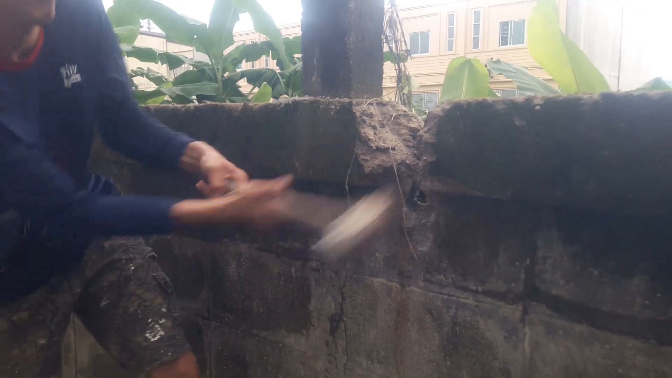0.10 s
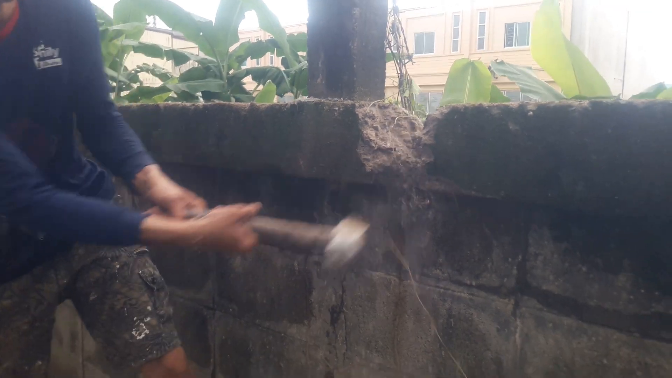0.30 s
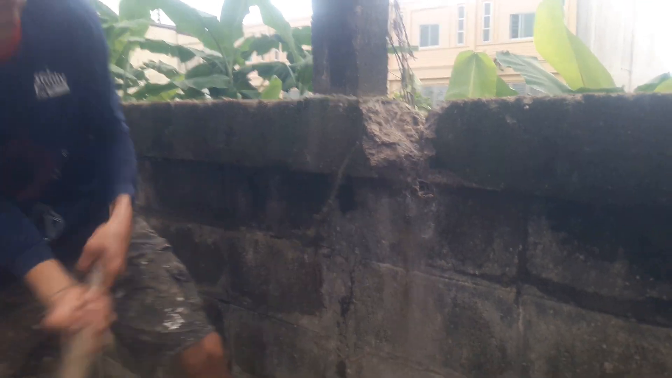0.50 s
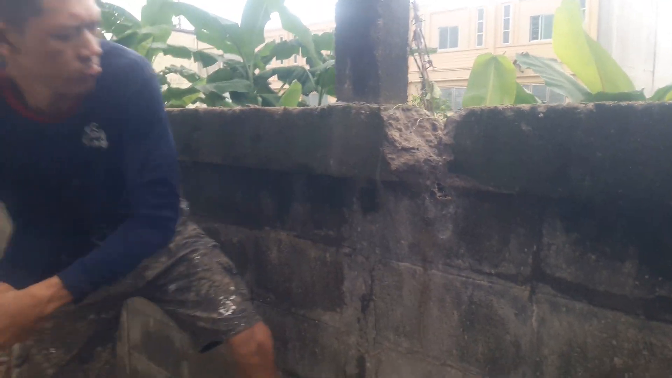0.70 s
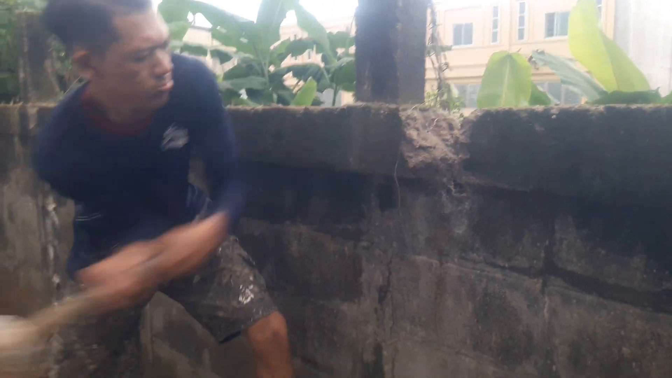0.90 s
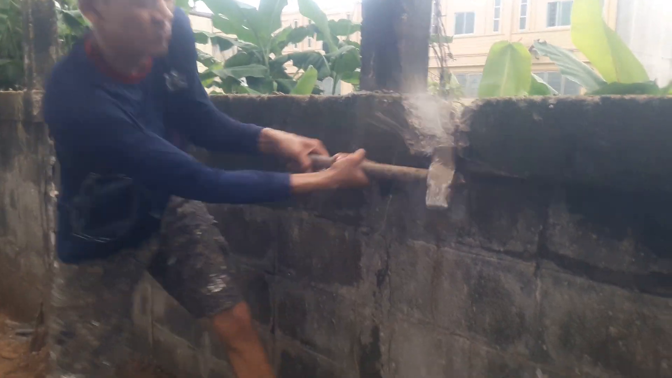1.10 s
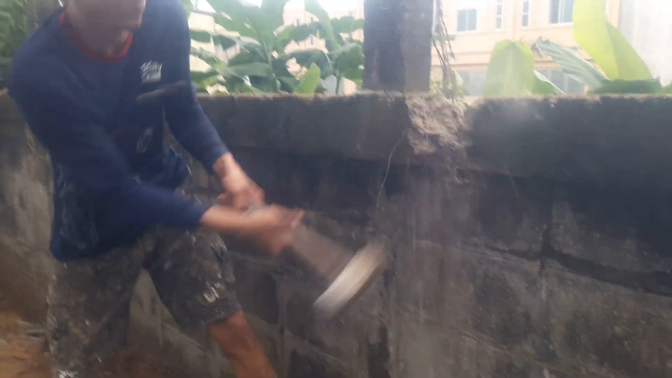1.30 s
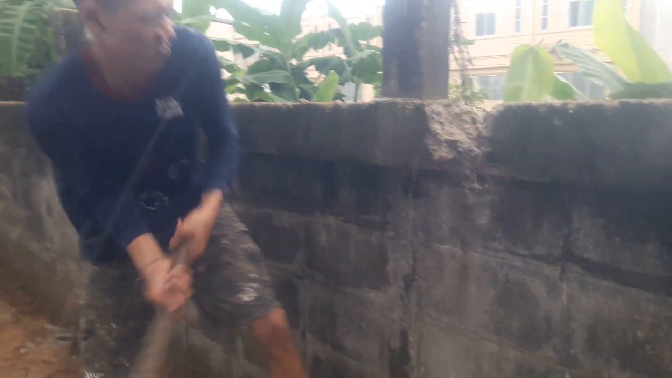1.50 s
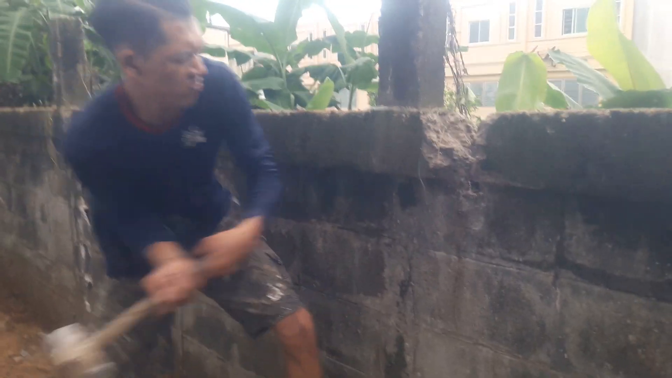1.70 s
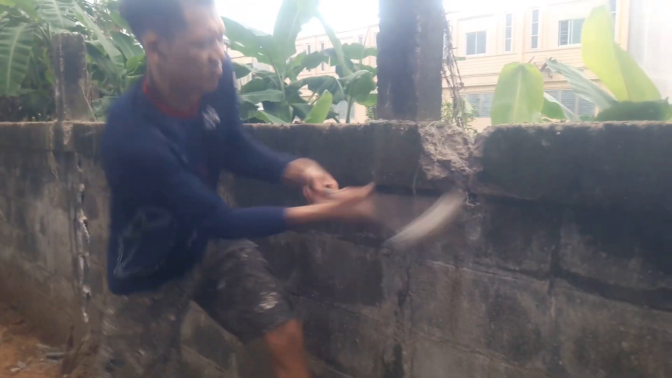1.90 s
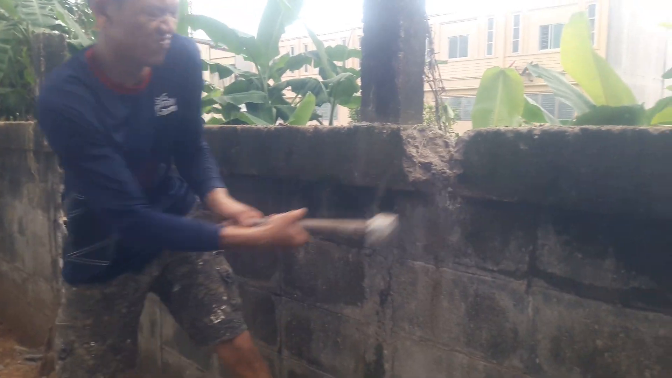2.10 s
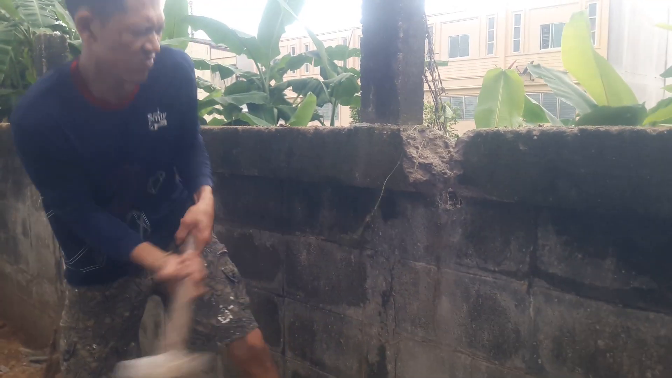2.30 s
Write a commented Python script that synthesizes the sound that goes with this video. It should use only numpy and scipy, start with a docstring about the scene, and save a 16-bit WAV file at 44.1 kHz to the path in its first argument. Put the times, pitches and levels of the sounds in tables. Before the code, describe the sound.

Sledgehammer blows hit a hollow concrete block wall at about 0.2, 1.1 and 2.0 seconds: hollow low-mid thud, crunching crack, quick yard reflections and a dull longer tail. The first is crunchiest, the second softer, the third loud and brighter with faint steel ring. Two tiny squeaks precede the first. Chips tick, a chunk knocks at 1.66, then rustle and grit increase. Faint air and hum persist.

```python
"""A faint low hum and a low background rumble run throughout; clothes and grit rustle and small chips tick
around three sledgehammer blows on a hollow concrete block wall in a small walled yard. Hum is narrow-band
noise; rustle is noise plus sparse grains; chips are short coloured noise bursts. Each blow sums decaying wall
modes, a decaying noise crack and two steel modes, then a delayed noise tail from the yard and from buildings
beyond. One larger chunk knocks as a few decaying modes."""
import sys
import numpy as np
from scipy import signal
from scipy.fft import rfft, irfft
from scipy.io import wavfile
from scipy.ndimage import uniform_filter1d

SR = 44100
rng = np.random.default_rng(int(sys.argv[2]) if len(sys.argv) > 2 else 0)


def generate_wav(sig):
    """Save sig (samples, or channels by samples) to the path in sys.argv[1] as 16-bit PCM at SR."""
    pcm = np.round(np.clip(np.atleast_2d(sig).T, -1, 1) * 32767).astype(np.int16)
    wavfile.write(sys.argv[1], SR, pcm)


N = 103635
TIME_S = np.arange(N) / SR   # scene time
TAIL_S = np.arange(SR) / SR   # time since an event


def amp(db):
    """Decibels to gain."""
    return 10 ** (np.asarray(db) / 20)


def rms_one(x):
    """Scale to unit rms."""
    return x / np.sqrt(np.mean(x ** 2) + 1e-20)


def at_hz(points, hz):
    """Interpolate (f/Hz, value) points on a log-frequency axis."""
    f, value = np.transpose(points)
    return np.interp(np.log(np.maximum(hz, 1)), np.log(f), value)


def level_curve(points):
    """Gain over the scene from (t/s, level/dB) points."""
    return amp(np.interp(TIME_S, *np.transpose(points)))


def dying(t60_s):
    """Exponential decay, -60 dB after t60."""
    return np.exp(-np.minimum(np.log(1000) * TAIL_S / max(t60_s, 1e-4), 60))


def add(out, s, sound):
    """Mix a sound in at a time, cut at the scene's end."""
    i = max(int(s * SR), 0)
    out[i:i + len(sound)] += sound[:max(N - i, 0)]


def colour(x, spectrum):
    """Filter noise by a gain spectrum."""
    hz = np.fft.rfftfreq(len(x), 1 / SR)
    return irfft(rfft(x) * amp(at_hz(spectrum, hz)), len(x))


def narrow_noise(hz, width_hz):
    """A wavering tone: noise through a narrow resonance, rms 1."""
    offset = (np.fft.rfftfreq(N, 1 / SR) - hz) / width_hz
    return rms_one(irfft(rfft(rng.standard_normal(N)) / (1 + offset ** 2), N))


def flutter(n, spread_db, smooth_s):
    """A gain that wanders at random, rms 1."""
    wander = uniform_filter1d(rng.standard_normal(n), max(int(smooth_s * SR), 1))
    return rms_one(amp(spread_db * rms_one(wander)))


def dying_noise(spectrum, t60s, tilt_db_per_octave):
    """Countless overlapping modes: octave bands of noise, each dying at its own rate."""
    hz = np.fft.rfftfreq(SR, 1 / SR)
    octave = np.log2(np.maximum(hz, 40) / 640)   # tilt pivots at 640 Hz
    gain_db = at_hz(spectrum, hz) + tilt_db_per_octave * octave
    noise = rfft(rng.standard_normal(SR)) * amp(gain_db)
    band = np.round(octave)
    out = np.zeros(SR)
    for k in np.unique(band):
        in_band = band == k
        out += irfft(noise * in_band, SR) * dying(at_hz(t60s, hz[in_band].mean()))
    return out


MODE_SPREAD_DB = 1.5


def ring(modes):
    """Struck modes (f/Hz, level/dB, t60/s): decaying sines, strengths redrawn for each hit."""
    out = np.zeros(SR)
    for k, (hz, db, t60_s) in enumerate(modes):
        strength = (-1) ** k * amp(db + MODE_SPREAD_DB * rng.standard_normal())
        out += strength * np.sin(2 * np.pi * hz * TAIL_S) * dying(t60_s)
    return out


# background rumble spectrum: f/Hz, relative gain/dB
RUMBLE_SPECTRUM = [(25, -30), (55, 2), (85, 4), (140, 4), (240, 2.5), (420, -7), (800, -7), (1400, -12.5),
                   (2100, -10.5), (3600, -34), (5300, -31), (7800, -40), (9000, -24), (10300, -61),
                   (15500, -62)]
# low background rumble rises and sinks: t/s, rms level/dB
RUMBLE_LEVEL_CURVE = [(0, -48), (.2, -49.5), (.6, -55), (.95, -57.5), (1.5, -52), (1.9, -54), (2.35, -45)]


def rumble():
    """Low background rumble: coloured noise under a slow level curve, louder at start and end."""
    return level_curve(RUMBLE_LEVEL_CURVE) * rms_one(colour(rng.standard_normal(N), RUMBLE_SPECTRUM))


# distant machinery: f/Hz, resonance width/Hz, rms level/dB
HUM_BANDS = [(151.9, 5.3, -56), (173.1, 7.6, -55), (321, 16, -58.5)]


def hum():
    """Distant machinery: wavering narrow-band tones."""
    return sum(amp(db) * narrow_noise(hz, width_hz) for hz, width_hz, db in HUM_BANDS)


# clothes and grit over time: t/s, level/dB
RUSTLE_LEVEL_CURVE = [(0, -53.5), (.1, -54.5), (.2, -55), (.45, -77), (.71, -63.5), (.74, -59.5), (.9, -56),
                      (1.1, -63.5), (1.3, -62.5), (1.57, -70.5), (1.69, -49), (1.85, -52), (2.0, -51.5),
                      (2.2, -50), (2.35, -58)]
# friction spectrum: f/Hz, relative gain/dB
RUSTLE_SPECTRUM = [(150, -5), (450, 9), (900, 0), (2100, 5.5), (3700, -6.5), (5600, 1), (7800, -9),
                   (9100, 0.5), (11000, -10), (13000, -6.5), (15500, -17)]
GRAINS_PER_S, GRAIN_SPREAD_DB, GRAIN_LIMIT, GRAIN_SHARE = 700, 3.5, 3, 0.97   # limit in spreads
RUSTLE_FLUTTER_DB, RUSTLE_FLUTTER_S = 2, 0.012


def rustle():
    """Clothes and grit underfoot: soft friction hiss with sharp little grains, rising and falling."""
    size_db = GRAIN_SPREAD_DB * np.minimum(rng.exponential(1, N), GRAIN_LIMIT)
    sizes = amp(size_db) * rng.choice([-1, 1], N)
    grains = rms_one(sizes * (rng.random(N) < GRAINS_PER_S / SR))
    friction = rng.standard_normal(N) + GRAIN_SHARE * grains
    friction = friction * flutter(N, RUSTLE_FLUTTER_DB, RUSTLE_FLUTTER_S)
    return level_curve(RUSTLE_LEVEL_CURVE) * rms_one(colour(friction, RUSTLE_SPECTRUM))


GRIT_DB, GRIT_S = 2.5, 0.0012   # unevenness of crumbling concrete
# chip spectrum points: f/Hz
CHIP_BANDS_HZ = [700, 1800, 2800, 4800, 11000]
CHIP_BASS_LIFT_DB, CHIP_TOP_CUT_DB = 7, 13   # at 150 and 16000 Hz, from the nearest band
CHIP_DIP_DB, CHIP_DIP_HZ, CHIP_DIP_OCTAVES = 9, 3650, 0.3


def chip_spectrum(levels_db):
    """Smoothed outline through the chip's band levels, with a dip in the treble."""
    hz = np.geomspace(100, 16000, 60)
    low, high = (150, levels_db[0] + CHIP_BASS_LIFT_DB), (16000, levels_db[-1] - CHIP_TOP_CUT_DB)
    outline = [low, *zip(CHIP_BANDS_HZ, levels_db), high]
    smooth_db = uniform_filter1d(at_hz(outline, hz), size=9)
    dip_db = CHIP_DIP_DB * np.exp(-(np.log2(hz / CHIP_DIP_HZ) / CHIP_DIP_OCTAVES) ** 2)
    return np.c_[hz, smooth_db - dip_db]


# chips crack off, land and shift: t/s, length/s (half the t60),
# then outline level/dB at each CHIP_BANDS_HZ, before smoothing and dip
CHIP_EVENTS = [(0.009, 0.011, -27, -59, -46, -40, -28.5), (0.079, 0.0089, -29, -27.5, -12.5, -37, -41),
               (0.2442, 0.017, -16, 7, -9.5, -19, -22), (0.2595, 0.0047, -8, -10, -22, -19, -18),
               (0.266, 0.0062, -12, -3, -15, -11, -28), (0.4999, 0.012, -22.5, -18, -33, -34, -51),
               (0.541, 0.007, -47, -50, -58, -32, -63), (0.5829, 0.012, -37.5, -7, -36, -33, -67),
               (0.735, 0.033, -60, -35, -46, -42, -55), (0.772, .008, -56, -54, -50, -50, -37.5),
               (0.825, 0.013, -26.5, -31, -39, -63, -62), (0.85, 0.02, -55, -30, -32, -62, -48),
               (1.083, .008, -55, -60, -53, -43, -54), (1.1684, 0.022, -26, -5, -16.5, -29, -26),
               (1.493, 0.0034, -56, -52, -52, -59, -48), (1.579, 0.013, -49, -44, -22, -43, -75),
               (1.6596, 0.011, -16.5, -8, -20, -23, -32.5), (1.736, 0.0067, -51, -48, -37, -45, -40),
               (1.772, 0.0092, -48, -24, -26, -46, -51), (1.818, 0.012, -41, -30, -38, -43, -36),
               (1.874, 0.01, -58, -33, -20, -42, -34), (1.918, 0.016, -25, -21.5, -13.5, -27.5, -35.5),
               (1.947, 0.012, -37, -31, -32, -38, -32), (1.958, 0.014, -22, -11, -9.5, -26, -25),
               (1.979, 0.035, -33, -29, -21, -33, -39), (2.0102, 0.0051, -2, 3.5, 3, -17, -16),
               (2.0332, 0.037, -2, -17, -19, -34, -25), (2.042, 0.0069, -5, -11, -7, -10, -49),
               (2.182, 0.02, -27, -30, -31, -36, -49), (2.258, 0.009, -37, -40, -29, -39.5, -44)]
CHIP_ATTACK_S, CHIP_BOUNCE_S, CHIP_BOUNCE_DB = 0.00062, 0.0025, -4


def chips():
    """Concrete chips: gritty noise clicks, each bouncing once."""
    out, n = np.zeros(N), SR // 4
    for s, length_s, *levels_db in CHIP_EVENTS:
        spectrum = chip_spectrum(levels_db)
        envelope = np.minimum(TAIL_S / CHIP_ATTACK_S, 1) * dying(2 * length_s)
        for delay_s, db in ((0, 0), (CHIP_BOUNCE_S, CHIP_BOUNCE_DB)):
            grit = rng.standard_normal(n) * flutter(n, GRIT_DB, GRIT_S)
            add(out, s + delay_s, amp(db) * colour(grit, spectrum) * envelope[:n])
    return out


# larger piece on the ground: f/Hz, relative level/dB, t60/s
CHUNK_RING = [(659, 2, 0.034), (1340, -0.5, 0.027), (1610, -6, 0.014), (1833, 6.5, 0.024), (2205, 4, 0.014),
              (5310, -4.5, 0.015)]
CHUNK_AT_S, CHUNK_DB = 1.6598, -24.5


def chunk():
    """A larger piece knocks on the ground and rings briefly in its own modes."""
    out = np.zeros(N)
    add(out, CHUNK_AT_S, amp(CHUNK_DB) * ring(CHUNK_RING))
    return out


ECHO_RISE_S = 0.0031


def arrival(s):
    """Sound sets in after a delay, on a linear ramp."""
    return np.clip((TAIL_S - s) / ECHO_RISE_S, 0, 1)


NEAR_WALL_S, NEAR_WALL_DB, ECHO_S = 0.0082, -6, 0.031


def yard_envelope():
    """The struck wall answers first, the facing wall fully a little later."""
    near = amp(NEAR_WALL_DB)
    return near * arrival(NEAR_WALL_S) + (1 - near) * arrival(ECHO_S)


# yard decay: f/Hz, t60/s
YARD_DECAY = [(100, 0.5), (500, 0.36), (2000, .32), (6000, 0.31), (14000, 0.26)]
DEBRIS_ECHO_DB, DEBRIS_LOW_CUT_HZ = -10, 300


def debris():
    """Chips and chunk, echoed by convolution with a unit-energy yard tail."""
    low_cut = signal.butter(2, DEBRIS_LOW_CUT_HZ, "high", fs=SR, output="sos")
    direct = signal.sosfilt(low_cut, chips() + chunk())
    echo_spectrum = [(2500, -1.5), (4000, 1.5), (15000, 3.5)]   # f/Hz, gain/dB
    echo = dying_noise(echo_spectrum, YARD_DECAY, 0) * yard_envelope()
    echo = rms_one(echo) / np.sqrt(SR)
    return direct + amp(DEBRIS_ECHO_DB) * signal.fftconvolve(direct, echo)[:N]


# faint high squeaks: t/s, half length/s (to 1/e), level/dB
SQUEAK_EVENTS = [(0.127, 0.0085, -57), (0.159, 0.013, -56)]
SQUEAK_HZ, SQUEAK_WIDTH_HZ = 4700, 120


def squeaks():
    """Two faint high squeaks: a wavering tone under bell-shaped swells."""
    swell = sum(amp(db) * np.exp(-((TIME_S - s) / half_s) ** 2) for s, half_s, db in SQUEAK_EVENTS)
    return swell * narrow_noise(SQUEAK_HZ, SQUEAK_WIDTH_HZ)


# hollow block modes: f/Hz, level/dB, t60/s
BLOCK_MODES = [(148, -18, 0.23), (195.5, -6.5, 0.03), (245, -14.5, 0.18), (296.2, -22.5, 0.24),
               (345, -19, 0.29), (407.6, -21.5, 0.2), (466.2, -12.5, 0.16), (634.7, -24, 0.092),
               (665, -20.5, 0.043), (749.5, -18.5, .14), (806, -24.5, 0.27), (1060, -18.5, 0.067),
               (1313, -29, 0.12), (1407, -32, 0.073), (2103, -28, 0.11)]
SPOT_OCTAVES, BASS_BELOW_HZ = 0.33, 360


def thud(spot_hz, spot_db, bass_db):
    """Hollow blocks ring; the spot struck decides which modes speak most."""
    modes = []
    for hz, db, t60_s in BLOCK_MODES:
        boost_db = spot_db * np.exp(-(np.log2(hz / spot_hz) / SPOT_OCTAVES) ** 2)
        modes.append((hz, db + boost_db + bass_db * (hz < BASS_BELOW_HZ), t60_s))
    return ring(modes)


# crushed concrete spectrum: f/Hz, relative gain/dB
CRACK_SPECTRUM = [(60, -37.5), (140, 3), (450, -0.5), (850, 0), (1400, -4), (2400, -12.5), (3400, -28),
                  (5200, -11.5), (7500, -26.5), (9200, -22.5), (15500, -40)]
# crushed concrete decay: f/Hz, t60/s
CRACK_DECAY = [(150, 0.15), (800, 0.16), (2500, 0.093), (6000, 0.026), (14000, .05)]
SNAP_DB, SNAP_T60_S = -11, 0.0089   # extra gain at first contact


def crack(tilt_db_per_octave):
    """Concrete crushed under the head: gritty dying noise with a snap at contact."""
    noise = dying_noise(CRACK_SPECTRUM, CRACK_DECAY, tilt_db_per_octave)
    snap = 1 + amp(SNAP_DB) * dying(SNAP_T60_S)
    return noise * snap * flutter(SR, GRIT_DB, GRIT_S)


# hammer head modes: f/Hz
STEEL_MODE_HZ = [9071, 13015]
# same modes: relative level/dB, t60/s
STEEL_MODE_DECAY = [(-3.5, 0.27), (-5.5, 0.21)]


def steel():
    """The steel head rings thinly in two high modes."""
    return ring([(hz, *mode) for hz, mode in zip(STEEL_MODE_HZ, STEEL_MODE_DECAY)])


# yard's answer to a blow: f/Hz, relative gain/dB
YARD_SPECTRUM = [(35, -52), (75, -12), (160, -5.5), (450, -1.5), (1000, -9), (2300, -13), (3100, -24.5),
                 (3900, -35), (5700, -24.5), (7600, -36), (9200, -27), (11000, -41), (12600, -28),
                 (15500, -53)]


def yard(tilt_db_per_octave):
    """Walls throw the blow back: dying noise, scaled up for the 1 kHz decay lost before the echo."""
    tail = dying_noise(YARD_SPECTRUM, YARD_DECAY, tilt_db_per_octave) * yard_envelope()
    return tail / dying(at_hz(YARD_DECAY, 1000))[int(ECHO_S * SR)]


# buildings beyond: f/Hz, relative gain/dB
FAR_SPECTRUM = [(50, -22.5), (180, -20), (450, -10.5), (1000, -23), (2200, -32), (3600, -43.5), (6000, -51),
                (15000, -53)]
FAR_T60_S = 1.017


def far_tail():
    """Buildings beyond the yard answer with a long dull tail."""
    return colour(rng.standard_normal(SR), FAR_SPECTRUM) * dying(FAR_T60_S) * arrival(ECHO_S)


# hammer blows: t/s, thud level/dB, crack level/dB, yard level/dB, brightness tilt/(dB per octave),
# steel level/dB, pitch favoured by the spot struck f/Hz, its boost/dB, bass boost/dB
BLOW_EVENTS = [(0.2151, -0.5, 2, 1, 0.42, -55, 595, 6, -6),
               (1.1420, -2, -6.5, -6.5, 0.5, -33, 580, 10, -0.5),
               (2.0072, 0.5, -2.5, -2.5, 1, -30.5, 813, 6.5, 1.5)]
CONTACT_S, BLOW_LOW_CUT_HZ = 0.00039, 90


def blows():
    """Thud, crack and steel share one contact ramp; yard and far tail follow."""
    out = np.zeros(N)
    low_cut = signal.butter(3, BLOW_LOW_CUT_HZ, "high", fs=SR, output="sos")
    contact = np.minimum(TAIL_S / CONTACT_S, 1)
    for s, thud_db, crack_db, yard_db, tilt, steel_db, *spot in BLOW_EVENTS:
        direct = amp(thud_db) * thud(*spot) + amp(crack_db) * crack(tilt) + amp(steel_db) * steel()
        echoes = amp(yard_db) * yard(tilt) + amp(thud_db) * far_tail()
        add(out, s, signal.sosfilt(low_cut, direct * contact) + echoes)
    return out


def scene():
    """Everything at one microphone."""
    return (rumble() + hum() + rustle() + debris() + squeaks() + blows())[None]


CLIP_LEVEL, CUTOFF_HZ = 1.3, 15800


def record(dry):
    """Peaks are rounded by tanh, then the top is cut by a steep low-pass."""
    rounded = CLIP_LEVEL * np.tanh(dry / CLIP_LEVEL)
    top_cut = signal.ellip(10, 0.1, 70, CUTOFF_HZ, fs=SR, output="sos")
    return signal.sosfilt(top_cut, rounded)


dry = scene()
out = record(dry)
generate_wav(out)
```